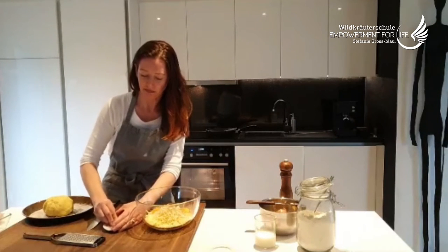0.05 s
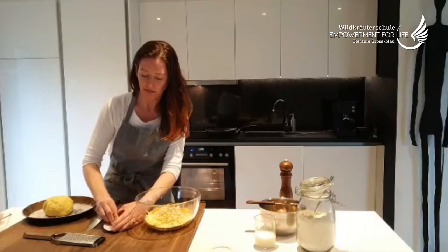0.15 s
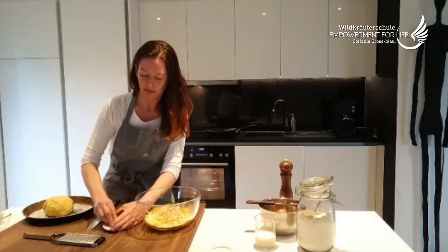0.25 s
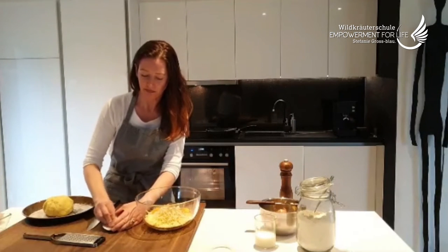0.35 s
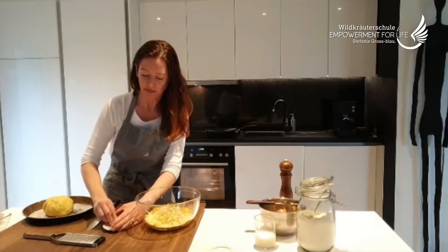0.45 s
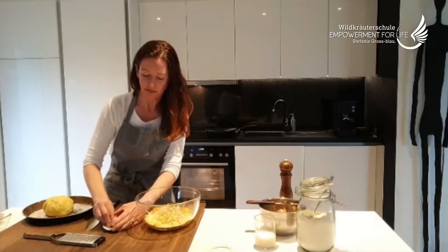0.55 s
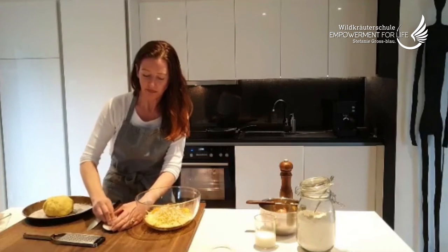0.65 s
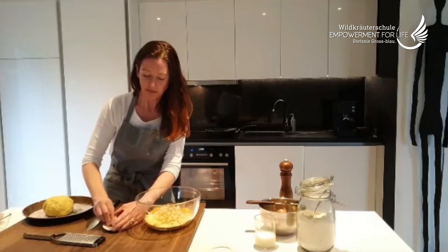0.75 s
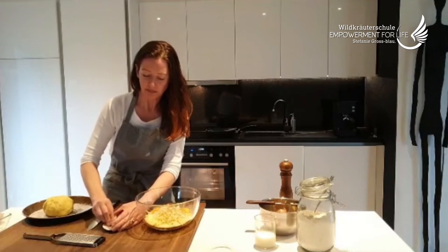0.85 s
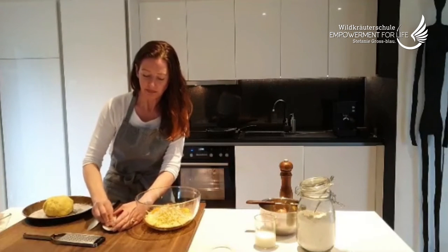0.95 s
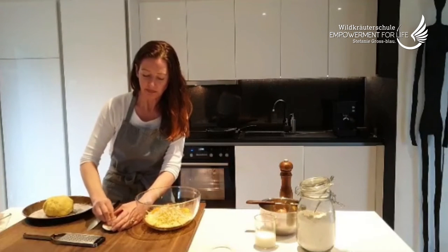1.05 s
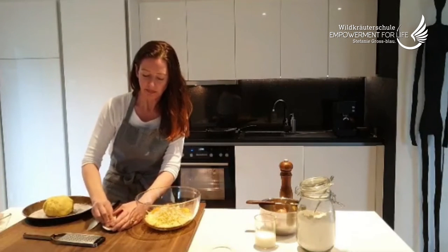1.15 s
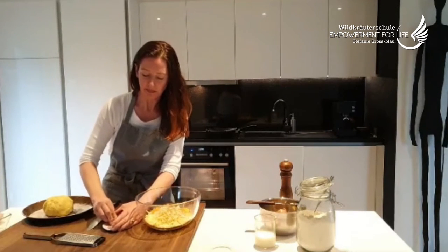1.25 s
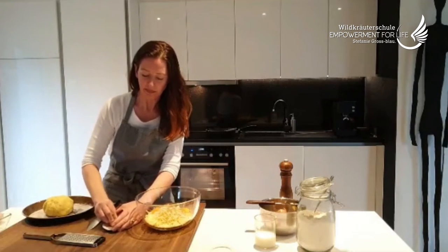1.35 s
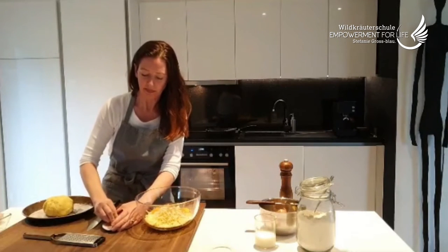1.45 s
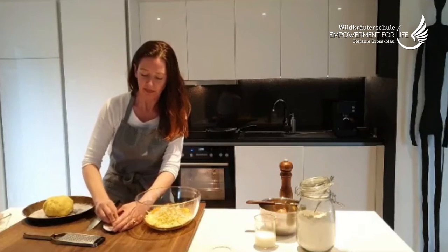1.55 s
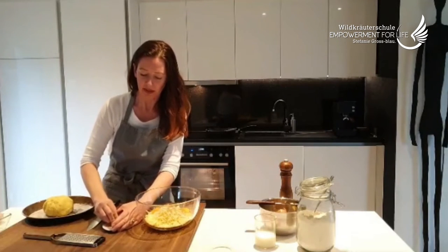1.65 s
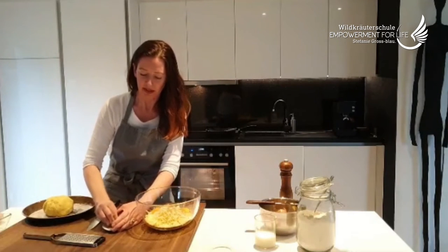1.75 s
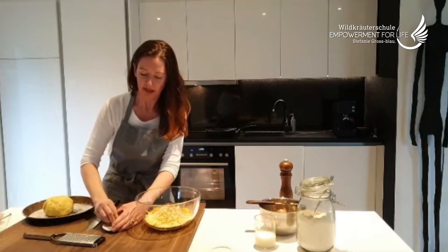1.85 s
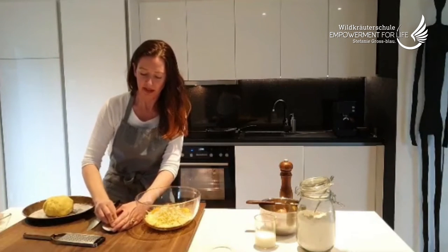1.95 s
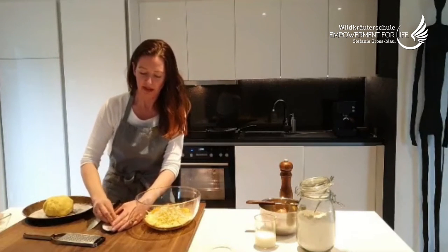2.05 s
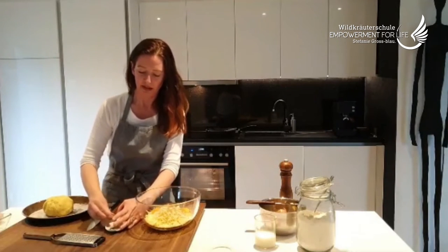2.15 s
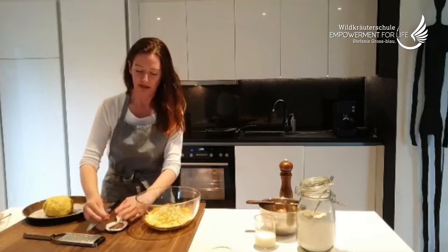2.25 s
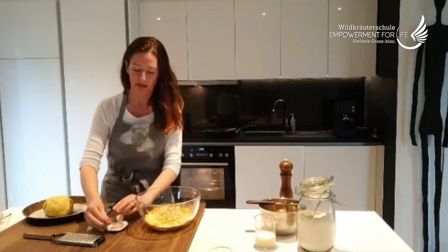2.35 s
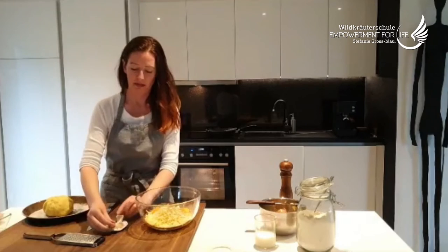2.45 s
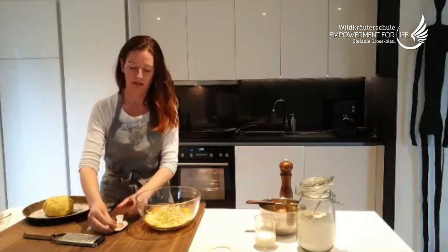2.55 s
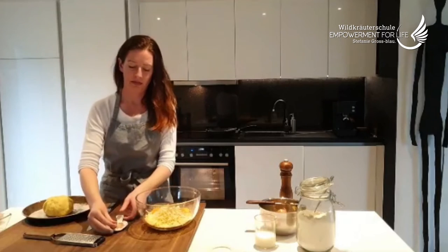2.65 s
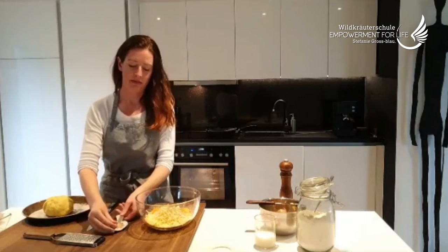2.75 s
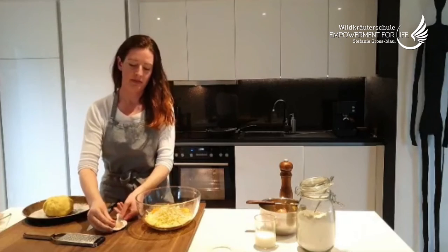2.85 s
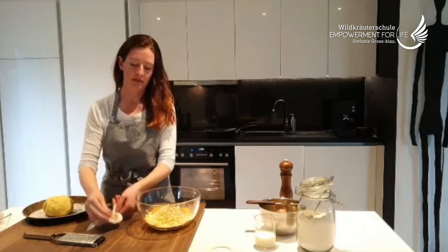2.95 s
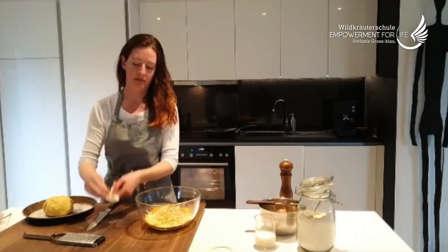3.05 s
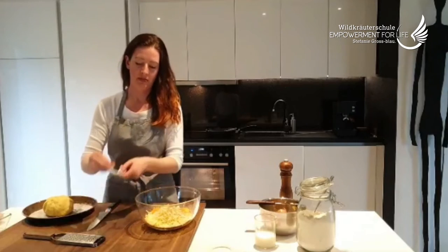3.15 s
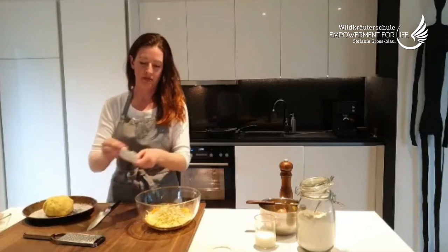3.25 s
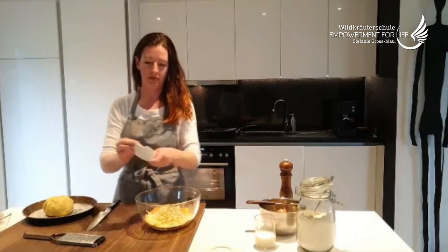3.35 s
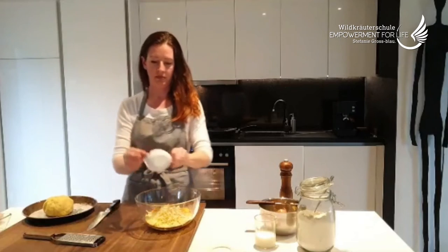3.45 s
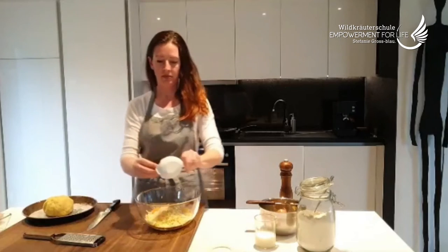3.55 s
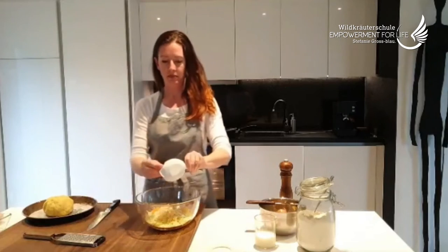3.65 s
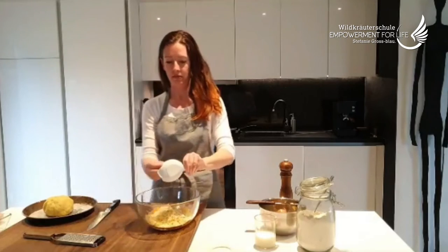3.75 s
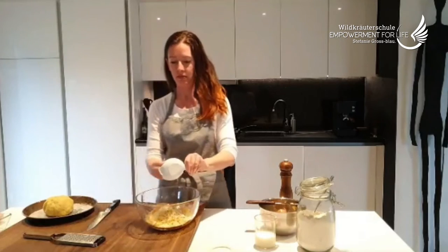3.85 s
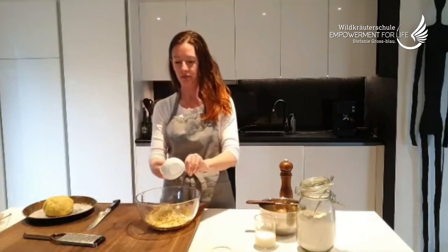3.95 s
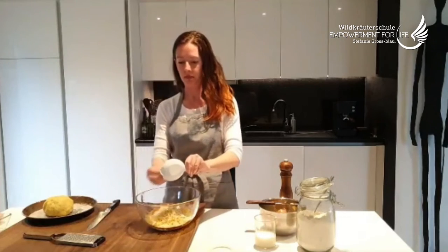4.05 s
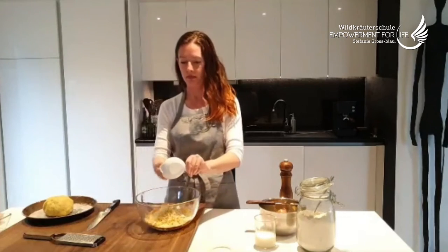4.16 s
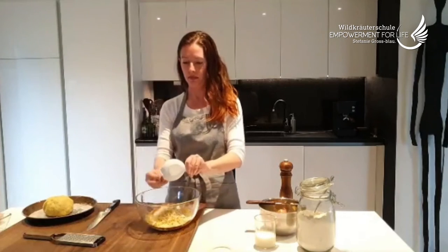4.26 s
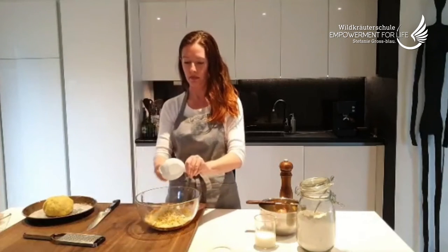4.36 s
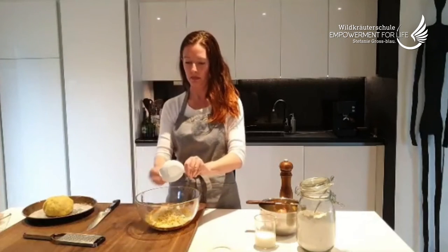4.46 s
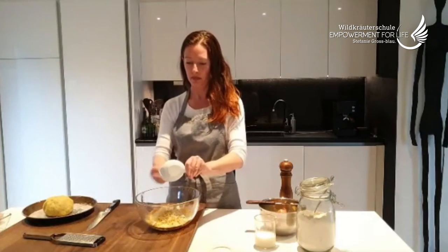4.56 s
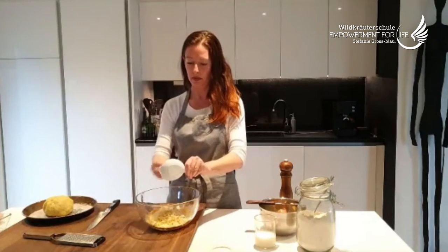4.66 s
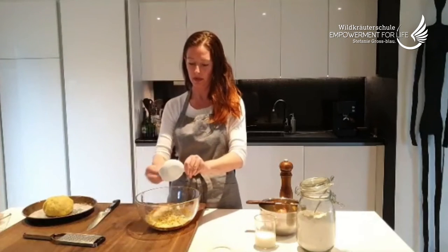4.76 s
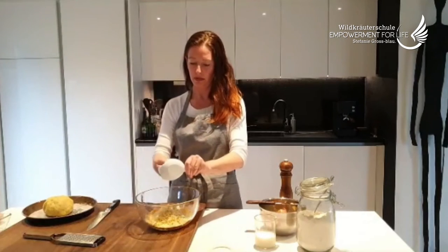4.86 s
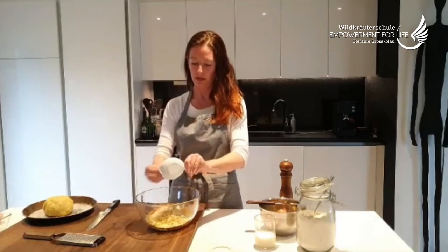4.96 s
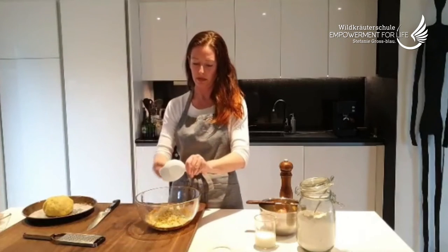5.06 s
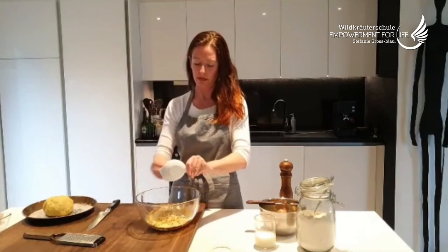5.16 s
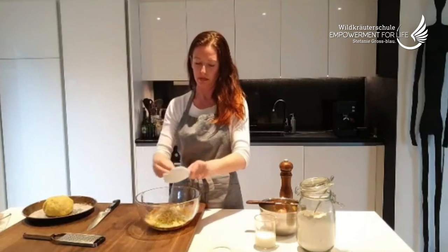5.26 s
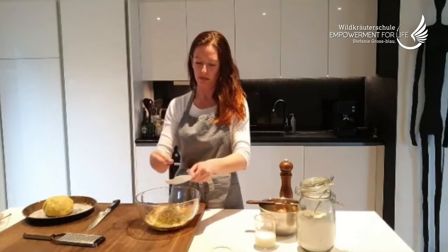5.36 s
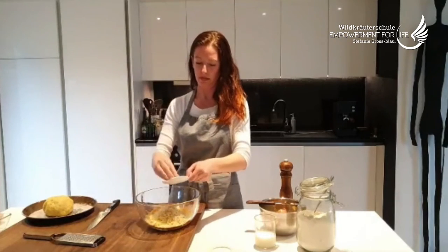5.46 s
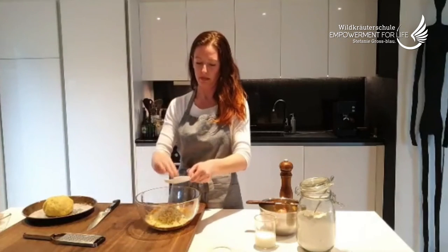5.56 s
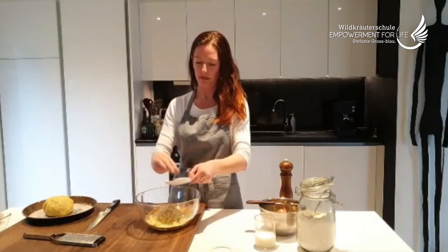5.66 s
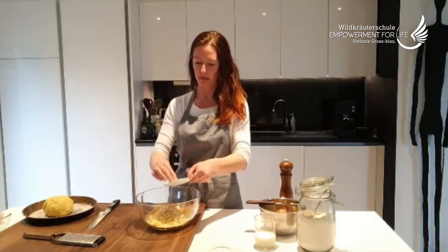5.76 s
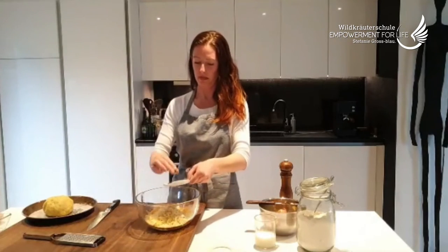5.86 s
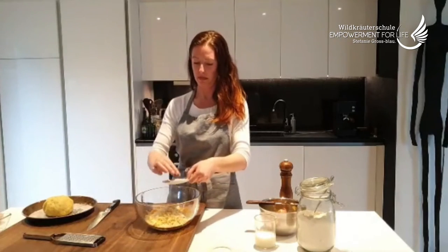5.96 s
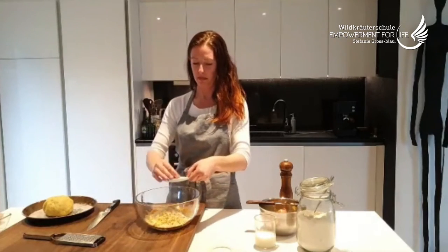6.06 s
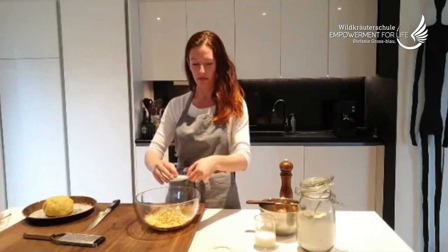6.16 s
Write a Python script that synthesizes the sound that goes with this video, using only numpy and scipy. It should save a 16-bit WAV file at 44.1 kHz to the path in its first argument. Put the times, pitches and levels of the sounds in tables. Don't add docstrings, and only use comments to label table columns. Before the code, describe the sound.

Quick rasping grating on a small toothed dish over a booming wooden board, a hard knock with a clink, then lighter ringing scrapes and soft taps.

```python
import sys
import numpy as np
from scipy import signal
from scipy.fft import rfft, irfft, next_fast_len
from scipy.io import wavfile
from scipy.ndimage import uniform_filter1d

SR = 44100
rng = np.random.default_rng(int(sys.argv[2]) if len(sys.argv) > 2 else 0)


def gain_from_db(level_db):
    decades = np.asarray(level_db, float) / 20
    return 10 ** decades


def digitize_waveform(pressure):
    field = np.atleast_2d(pressure).T
    bounded = np.clip(field, -1, 1)
    quanta = np.round(bounded * 32767).astype(np.int16)
    wavfile.write(sys.argv[1], SR, quanta)


N = 273949

# (time [s], force [dB], board boom [dB re force], push share [0-1])
GRIND_STROKES = [(0.0, -7, -6.5, .4), (0.058, -8.5, -7.5, 0.67), (0.169, -22, -17.5, .6),
                 (0.265, -15.5, -3, 0.6), (0.354, -8.5, -6.5, 0.86), (0.468, -4.5, -17.5, 0.1),
                 (0.488, -6.5, -21, 0), (0.574, -9, -7, .85), (0.664, -7, -3.1, 0.7),
                 (0.771, -5, -4.5, 0.8), (0.867, -5, -2.8, 0), (0.964, -3, -16, 0.75), (1.069, -4, -8, 0.1),
                 (1.169, -4, -8, 0.74), (1.269, -7.5, -4.5, 0.6), (1.384, -6, -10, 0.74),
                 (1.479, -8, -1.7, .05), (1.557, -15.5, -28, 0.6), (1.658, -21.5, -12.5, 0.9),
                 (1.765, -6, -6.5, 0.7), (1.811, -38.5, -2, 0.1), (1.869, -7, -6, 0.61),
                 (1.976, -11.5, -13, 0.88), (2.059, -23, -10.5, 0.9)]
# (time [s], blow [dB], clink [dB re blow], fall [s])
KNOCK_BLOWS = [
    (2.232, -8.5, -44.5, 0.015),
    (2.283, -4, -27, 0.0079),
    (2.294, -10, -27.5, 0.0025),
]
# (frequency [Hz], width [Hz], level [dB])
PLATE_MODES = [(963, 5, 3.5), (1376.5, 8.3, -2.5), (1599, 36, 1.5), (2065, 37, -13), (2490, 24, -19)]
# (frequency [Hz], width [Hz], level [dB])
FREE_RING_MODES = [(8480, 22, 0), (13800, 45, -16)]
# (frequency [Hz], likeness [-1 to 1])
ROOM_LIKENESS = [(60, 0.82), (250, 0.59), (500, 0.83), (1000, 0.056), (4000, -0.0047), (9000, -0.2)]


def evened(x):
    return x / np.sqrt(np.mean(x ** 2) + 1e-20)


def between(pull, push, share):
    return pull + (push - pull) * np.clip(share, 0, 1)


def read(points, hz):
    f, value = np.transpose(points)
    return np.interp(np.log(hz + 1), np.log(f + 1), value)


def causal(points, size=4096):
    db = np.maximum(read(points, np.fft.rfftfreq(size, 1 / SR)), -100)
    log_gain = np.log(gain_from_db(db))
    circle = np.concatenate([log_gain, log_gain[-2:0:-1]])
    h = np.fft.ifft(np.exp(np.conj(signal.hilbert(circle)))).real[:size // 2]
    return h / np.linalg.norm(h)


def ringing(modes, order=0, size=8192):
    t = np.arange(size) / SR
    h = np.zeros(size)
    for hz, width, db in modes:
        swell = gain_from_db(db) * width ** (order + .5) * t ** order
        h += swell * np.exp(-np.pi * width * t) * np.sin(2 * np.pi * hz * t)
    return h / np.linalg.norm(h)


def teeth(per_s, spread_db):
    when, size, sign = rng.random((N + SR, 3)).T
    size_db = spread_db * np.minimum(-np.log(size + 1e-9), 4)
    return evened((when < per_s / SR) * np.sign(sign - .5) * gain_from_db(size_db))


def strokes(rows, rasp, plate, plate_db, low, high, per_s, spread_db, bite):
    force = np.zeros((3, N + SR))
    clicking = teeth(per_s, spread_db)
    u = np.arange(SR // 4) / SR
    for s, db, low_db, high_db, rise, fall in rows:
        at = slice(round(s * SR), round(s * SR) + len(u))
        swell = np.minimum(u / rise, 1) * np.exp(-np.maximum(u - rise, 0) / fall)
        drive = swell * clicking[at]
        drive[0] = bite / rise
        force[:, at] += gain_from_db(np.array([[db], [db + low_db], [db + high_db]])) * drive
    body = np.pad(causal(rasp), (0, 6144)) + gain_from_db(plate_db) * ringing(plate)
    responses = (body, ringing(low, order=1), ringing(high))
    return np.array([signal.oaconvolve(f, h)[:N] for f, h in zip(force, responses)])


def clicks(rows, response):
    s, db = np.transpose(rows)
    train = np.zeros(N)
    train[np.round(s * SR).astype(int)] = gain_from_db(db)
    return signal.oaconvolve(train, response)[:N]


def coloured(points, channels=1):
    noise = rng.standard_normal((channels, N))
    return evened(signal.oaconvolve(noise, causal(points)[None], axes=1)[:, :N])


def liken(pair, points):
    size = next_fast_len(pair.shape[1])
    a, b = rfft(pair, size)
    same = np.clip(read(points, np.fft.rfftfreq(size, 1 / SR)), -1, 1)
    right = same * a + np.sqrt(1 - same ** 2) * b
    return irfft(np.array([a, right]), size)[:, :pair.shape[1]]


def ground_dish():
    # (frequency [Hz], density [dB per Hz])
    rasp_tone = [(400, -42.5), (650, 1.5), (780, -14), (920, -1), (1400, -2), (1940, -4), (2450, -12.5),
                 (3250, -18), (3900, -29), (6500, -35), (8700, -41), (10300, -48.5), (11600, -74)]
    # (frequency [Hz], width [Hz], level [dB])
    board_modes = [(510, 40, -5), (582, 55, 0), (612, 60, -5), (690, 70, -3)]
    # (frequency [Hz], width [Hz], level [dB])
    damped_modes = [(8635, 750, 13.5), (9500, 200, -20)]
    rise_s = 0.016
    rows = []
    for s, db, boom_db, push in GRIND_STROKES:
        ring_db = between(-52.5, -20, push)
        fall_s = between(0.021, 0.042, push)
        rows.append((s, db, boom_db, ring_db, rise_s, fall_s))
    return gain_from_db(-7.0) * strokes(rows, rasp_tone, PLATE_MODES, -18.5, board_modes, damped_modes,
                               per_s=4000., spread_db=2.95, bite=0.13)


def scraped_dish():
    # (time [s], force [dB], dish ring [dB re force], fall [s])
    air_strokes = [(3.874, -24.5, -20, 0.0062), (3.884, -18.5, -14.5, 0.018), (3.911, -17, -18, 0.0041),
                   (3.9747, -15, -8.5, 0.0061), (3.992, -28, -21, 0.0076), (4.0487, -14.5, -6, 0.011),
                   (4.068, -21.5, -7, 0.014), (4.12, -12, -37, 0.016), (4.1437, -21.5, 1.5, 0.012),
                   (4.2306, -15.5, -10, 0.0051), (4.245, -14.5, -6, 0.01), (4.3111, -13, -17, 0.016),
                   (4.3367, -31, -21, 0.015), (4.3925, -19, -26, 0.008), (4.4061, -9.5, -11.5, 0.0079),
                   (4.4322, -21, -17, 0.006), (4.4873, -17, -14.5, 0.015), (4.57, -12.5, -15, 0.019),
                   (4.6507, -11.5, -10.5, 0.029), (4.7534, -12.5, -9.5, 0.01), (4.8208, -16, -6.5, 0.033),
                   (4.9084, -11, -5, 0.022), (4.995, -18, -23.5, 0.01), (5.013, -14, 5, 0.0045),
                   (5.0904, -9, -10, 0.0073), (5.103, -16, -6, 0.0048), (5.1769, -20.5, -12, 0.017),
                   (5.191, -16, -4, 0.0046), (5.253, -19.5, -4.5, 0.0054), (5.267, -17.5, -12.5, 0.0045)]
    # (frequency [Hz], density [dB per Hz])
    rasp_tone = [(170, -58.5), (340, -0.5), (450, -44.5), (900, -8.5), (1170, -7), (1530, 5), (2150, -4),
                 (2600, 3.5), (3600, -5.5), (5700, -20), (6530, -16), (8000, -25), (9700, -22),
                 (10600, -47)]
    # (frequency [Hz], width [Hz], level [dB])
    rim_modes = [(312, 42, -1), (635, 160, 3), (1700, 60, -21), (2870, 90, -1.5), (2882, 89, -3.5),
                 (3084, 81, -1.5)]
    # (frequency [Hz], width [Hz], level [dB])
    edge_modes = [(3960, 520, 24.5), (5000, 450, 15.5)]
    edge_db, rise_s = -35, 0.0076
    rows = [(s, db, edge_db - db, ring_db, rise_s, fall) for s, db, ring_db, fall in air_strokes]
    return gain_from_db(-8.5) * strokes(rows, rasp_tone, rim_modes, -11.0, edge_modes, FREE_RING_MODES,
                               per_s=2000., spread_db=4.7, bite=0.068)


def snagging_teeth():
    # (time [s], peak [dB])
    snags = [(3.8847, -27), (3.8943, -24), (3.8963, -13.5), (3.9147, -14), (3.9766, -17), (4.0489, -11.5),
             (4.1178, -13.5), (4.232, -20.5), (4.246, -9.5), (4.3098, -20), (4.3098, -13.5),
             (4.5675, -18.5), (4.6505, -9.5), (4.7654, -12.5), (4.8196, -26), (4.91, -13), (4.9161, -15.5),
             (4.9963, -16), (5.0898, -12.5), (5.1823, -16.5), (5.1813, -9.5), (5.2725, -11)]
    # (frequency [Hz], density [dB per Hz])
    snag_tone = [(500, -30.5), (1300, -3), (2600, 9), (4500, -7), (7000, -19), (12000, -34)]
    return gain_from_db(10.0) * clicks(snags, causal(snag_tone))


def tapped_dish():
    # (time [s], force [dB], cup [dB re force], dish ring [dB re force], fall [s])
    finger_taps = [
        (5.536, -21, -18, -60, 0.0028),
        (5.684, -20, -36, 2, 0.0045),
        (5.857, -28, -14, -8, 0.0051),
        (6.108, -42.5, -4, -24, 0.03),
        (6.1913, -43, -6.5, -15.5, 0.008),
    ]
    # (frequency [Hz], density [dB per Hz])
    tap_tone = [(300, -10), (600, -9.5), (1200, -7), (1600, 0), (2200, 1.5), (3000, 1.5), (4200, -12),
                (6500, -13), (8000, -20), (9800, -22.5), (11000, -33.5)]
    # (frequency [Hz], width [Hz], level [dB])
    tapped_modes = [(1560, 300, -3), (2680, 260, -2)]
    # (frequency [Hz], width [Hz], level [dB])
    hand_modes = [(693, 79, 5.5), (1015, 460, 5)]
    rise_s = .003
    rows = [(s, db, cup_db, ring_db, rise_s, fall) for s, db, cup_db, ring_db, fall in finger_taps]
    return gain_from_db(-4.0) * strokes(rows, tap_tone, tapped_modes, -11.5, hand_modes, FREE_RING_MODES,
                               per_s=6000., spread_db=1.6, bite=0.0073)


def knocked_dish():
    # (time [s], blow [dB], board boom [dB re blow], length [s])
    rocking = [
        (2.375, -31, -42, 0.038),
        (2.601, -41, 7.5, 0.031),
        (2.707, -48.5, 11, 0.0095),
        (2.779, -59.5, 6, 0.055),
        (2.865, -59.5, 12.5, 0.056),
        (2.947, -58, 15.5, 0.037),
    ]
    # (frequency [Hz], density [dB per Hz])
    blow_tone = [(350, -41), (600, -2), (800, -13.5), (1300, 6), (1600, 4.5), (2000, 0), (2800, -7.5),
                 (3400, -25.5), (6000, -46), (10000, -43)]
    # (frequency [Hz], width [Hz], level [dB])
    knocked_modes = [(608, 70, 0), (705, 80, -1)]
    # (frequency [Hz], width [Hz], level [dB])
    clink_modes = [(5230, 11, 0), (3950, 50, -9), (8500, 80, -20)]
    boom_db, rise_s = 0.1, 0.002
    rows = [(s, db, boom_db, clink_db, rise_s, fall) for s, db, clink_db, fall in KNOCK_BLOWS]
    rise_share, rocking_clink_db = 0.42, -27
    for s, db, rock_boom_db, length in rocking:
        rows.append((s, db, rock_boom_db, rocking_clink_db, rise_share * length, (1 - rise_share) * length))
    return gain_from_db(-2.5) * strokes(rows, blow_tone, PLATE_MODES, -5.0, knocked_modes, clink_modes,
                               per_s=6000., spread_db=2.0, bite=0.0079)


def rim_chimes():
    # (time [s], level [dB])
    chimes = [
        (2.284, -22),
        (2.298, -9),
        (2.612, -33),
    ]
    # (frequency [Hz], width [Hz], level [dB])
    chime_modes = [(5230, 5, 0), (3950, 12, -8)]
    return clicks(chimes, ringing(chime_modes, size=16384))


def reflections():
    # (frequency [Hz], t60 [s])
    kitchen_t60 = [(150, 0.37), (660, 0.8), (1740, 0.55), (4600, 0.78), (9000, 0.57), (13800, 0.2)]
    # (level over the tail [dB], t60 [s])
    nearby = (5.7, 0.035)
    taps = np.zeros((2, 32768))
    at = np.arange(60, 32740, 20)
    at = at + rng.integers(0, 20, (2, len(at)))
    np.put_along_axis(taps, at, rng.choice([-1., 1.], at.shape), 1)
    hz, t, z = signal.stft(liken(taps, ROOM_LIKENESS), SR, nperseg=256)
    late = gain_from_db(-60 * t / read(kitchen_t60, hz)[:, None])
    early = gain_from_db(nearby[0] - 60 * t / nearby[1])
    tail = signal.istft(z * (late + early), SR, nperseg=256)[1]
    return tail / np.linalg.norm(tail[0])


def kitchen(x):
    shifts_per_s = 2.3
    phase = np.pi * shifts_per_s * np.arange(N) / SR
    out = np.zeros((2, N))
    for share in (np.sin(phase), np.cos(phase)):
        out += signal.oaconvolve((x * share)[None], reflections(), axes=1)[:, :N]
    return out


def counter():
    # (frequency [Hz], density [dB per Hz])
    rumble_tone = [(45, -38), (70, -7.5), (100, -16.5), (143, -4.5), (190, -8.5), (350, -11.5), (430, -20),
                   (600, -48.5)]
    # (time [s], peak [dB], frequency [Hz], rise [s], t60 [s])
    thuds = [
        (0.018, -31, 71.4, 0.014, 0.83),
        (.4, -28.5, 69.4, 0.027, 0.75),
        (1.381, -21, 69.5, .05, 1),
        (1.777, -10.5, 69.7, 0.052, 0.55),
        (1.98, -18.5, 79, 0.027, 0.24),
    ]
    weights = [(s, db + between(-24, -18, push)) for s, db, _, push in GRIND_STROKES]
    weights += [(s, db - 34.5) for s, db, *_ in KNOCK_BLOWS]
    rise_s, fall_s = 0.029, 0.1
    t = np.arange(N) / SR
    lean = np.zeros(N)
    for s, db in weights:
        u = np.maximum(t - s, 0)
        swell = np.minimum(u / rise_s, 1) * np.exp(-np.maximum(u - rise_s, 0) / fall_s)
        lean = np.hypot(lean, gain_from_db(db) * swell)
    out = coloured(rumble_tone)[0] * lean
    for start, peak_db, hz, rise, t60 in thuds:
        u = np.maximum(t - start, 0)
        out += gain_from_db(peak_db - 60 * u / t60) * np.minimum(u / rise, 1) * np.sin(2 * np.pi * hz * u)
    return out


def fridge():
    # (time [s], frequency [Hz], level [dB])
    hum = [(0, 48.78, -32.5), (2, 49.0, -31), (2.6, 49.1, -34.5), (3.301, 47.8, -34.5), (3.8, 51.06, -35),
           (4.499, 50.3, -32.5), (5.2, 47.55, -33.5), (6.21, 49.9, -35.5)]
    # (multiple [1], level [dB re hum])
    overtones = [(2, -24.5), (3, -38.5)]
    s, hz, db = np.transpose(hum)
    t = np.arange(N) / SR
    phase = 2 * np.pi * np.cumsum(np.interp(t, s, hz)) / SR
    wave = np.sin(phase) + sum(gain_from_db(rel_db) * np.sin(k * phase) for k, rel_db in overtones)
    return np.sqrt(2) * gain_from_db(np.interp(t, s, db)) * wave


def hiss():
    # (frequency [Hz], density [dB per Hz])
    floor_tone = [(45, -2.5), (62, 10), (100, 13), (125, -2.5), (200, -4), (400, -15.5), (1000, -21),
                  (2500, -19.5), (4500, -16.5), (6500, -14), (8500, -20), (11000, -22.5), (14000, -33.5),
                  (15500, -51)]
    return gain_from_db(-50) * liken(coloured(floor_tone, channels=2), ROOM_LIKENESS)


def scene():
    rasped, boom, ring = ground_dish() + scraped_dish() + tapped_dish() + knocked_dish()
    snaps = snagging_teeth()
    direct = gain_from_db(-5.5) * rasped + boom + gain_from_db(2.0) * ring + snaps + rim_chimes()
    direct = np.array([np.roll(direct, 2), direct])
    room = kitchen(rasped + gain_from_db(-2.5) * boom + gain_from_db(-9.0) * ring + gain_from_db(-4.5) * snaps)
    return direct + gain_from_db(0.03) * room + counter() + fridge() + hiss()


def microphone_ports(dry):
    # (frequency [Hz], left minus right [dB])
    tilt = [(60, 1.65), (150, 1.6), (300, 3), (1000, 3), (3000, 5), (6500, 9), (8480, -8), (10000, -5.5),
            (13800, 6)]
    # (centre [Hz], width [Hz], depth [dB])
    notch = (7600, 450, -12)
    size = next_fast_len(N)
    hz = np.fft.rfftfreq(size, 1 / SR)
    centre_hz, width_hz, depth_db = notch
    notch_db = depth_db * np.exp(-((hz - centre_hz) / width_hz) ** 2)
    port_db = notch_db + np.array([[.5], [-.5]]) * read(tilt, hz)
    return irfft(rfft(dry, size) * gain_from_db(port_db), size)[:, :N]


def gated(x):
    # (frequency [Hz], level [dB])
    gate = [(6800, -80), (7200, -30), (8000, -30), (8300, -42), (10200, -41), (10700, -31), (14200, -31),
            (14600, -24)]
    hz, _, z = signal.stft(x, SR, nperseg=1024, noverlap=768)
    energy = abs(z) ** 2
    patch = uniform_filter1d(uniform_filter1d(energy, size=9, axis=1), size=3, axis=2)
    whole = energy[:, 4:].sum(1, keepdims=True) / 100
    kept = patch > gain_from_db(2 * read(gate, hz))[:, None] * whole
    return signal.istft(z * kept, SR, nperseg=1024, noverlap=768)[1][:, :N]


def input_crackle():
    # (time [s], peak [dB])
    crackles = [(0.287, -48), (0.497, -47.5), (0.503, -44.5), (0.509, -39.5), (0.681, -49), (0.995, -52.5),
                (1.199, -42.5), (1.775, -46.5), (2.238, -37.5), (2.288, -33.5), (2.298, -42)]
    # (frequency [Hz], density [dB per Hz])
    crackle_tone = [(2500, -24), (5000, -2), (8000, 0), (15500, -7)]
    return clicks(crackles, causal(crackle_tone))


def top_cut(x):
    return signal.sosfilt(signal.butter(12, 15780, fs=SR, output="sos"), x)


def record(dry):
    mix = gated(microphone_ports(dry)) + input_crackle()
    return top_cut(np.clip(mix, -1, 1))


dry = scene()
out = record(dry)
digitize_waveform(out)
```